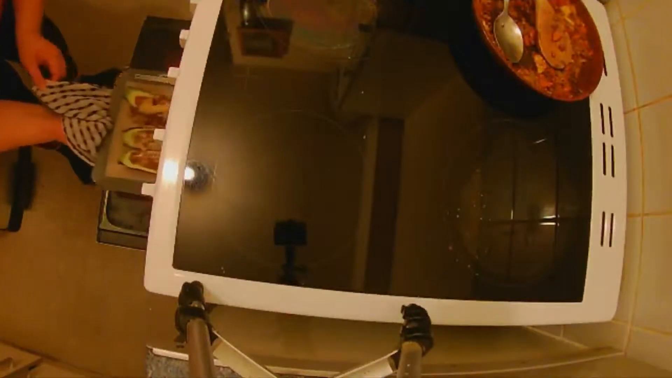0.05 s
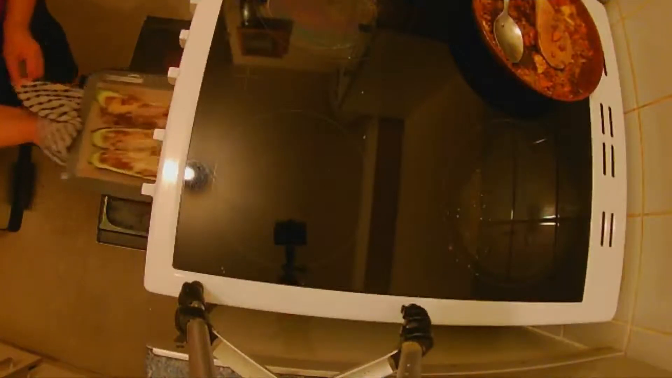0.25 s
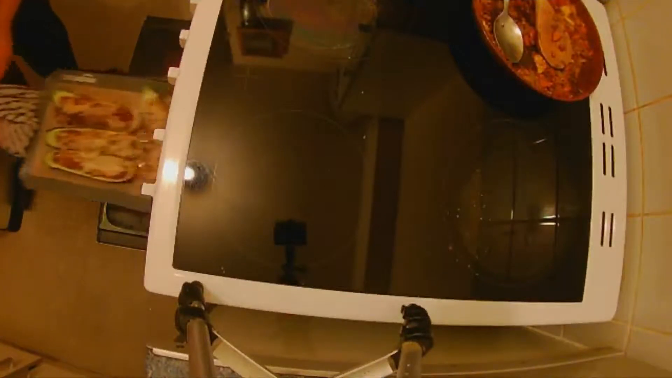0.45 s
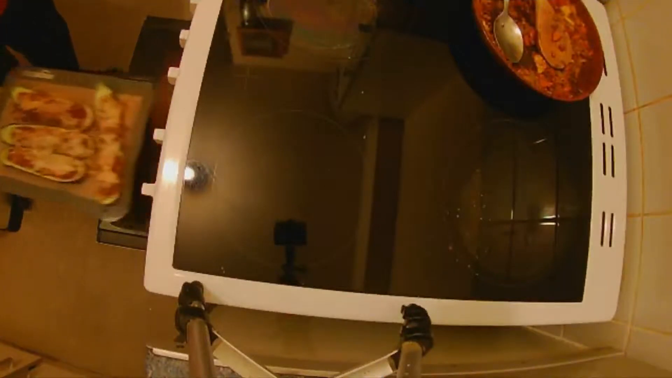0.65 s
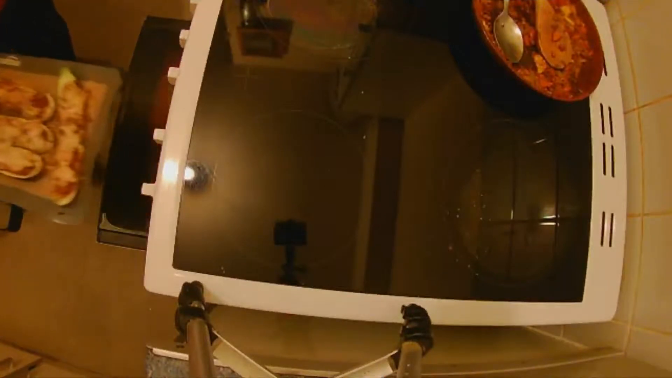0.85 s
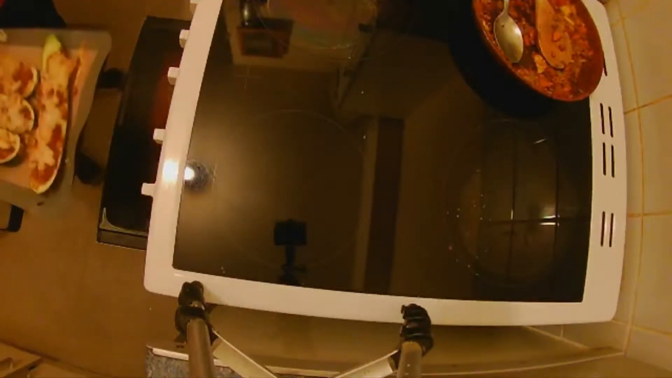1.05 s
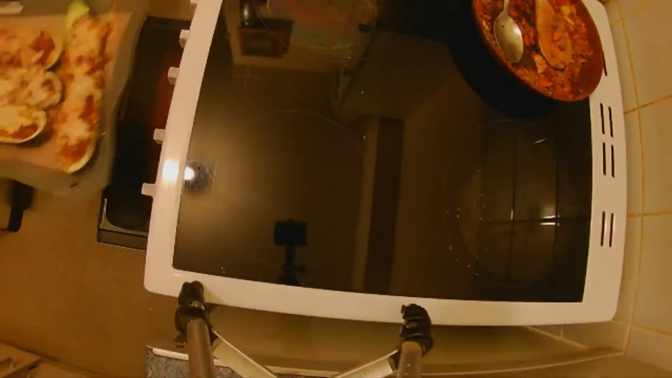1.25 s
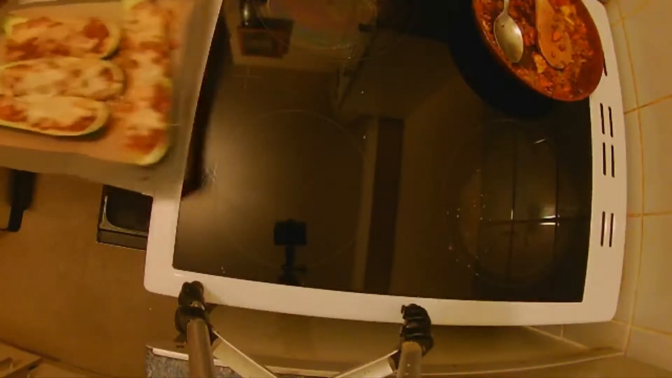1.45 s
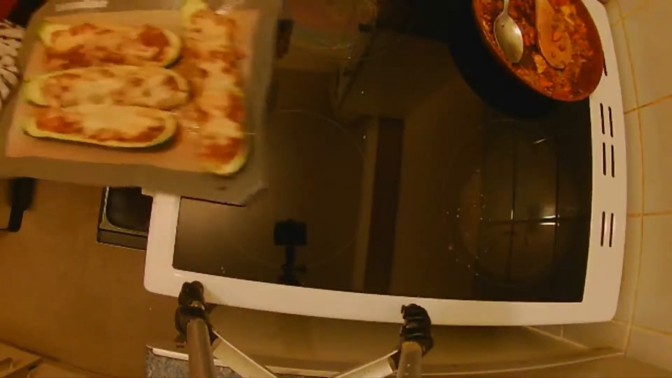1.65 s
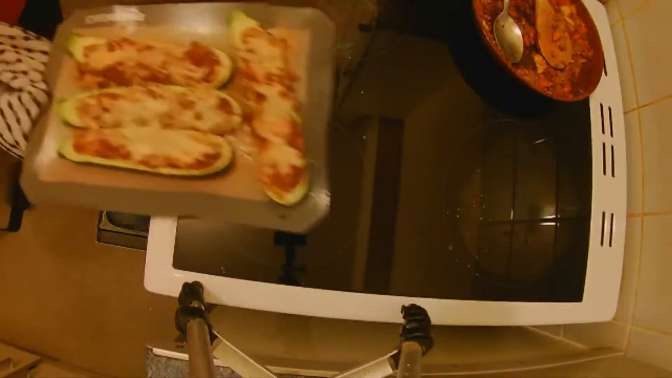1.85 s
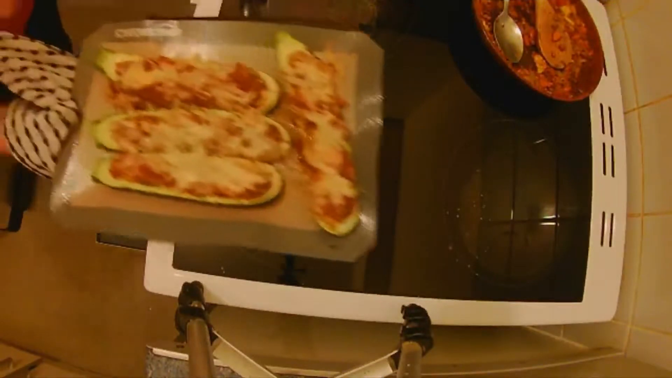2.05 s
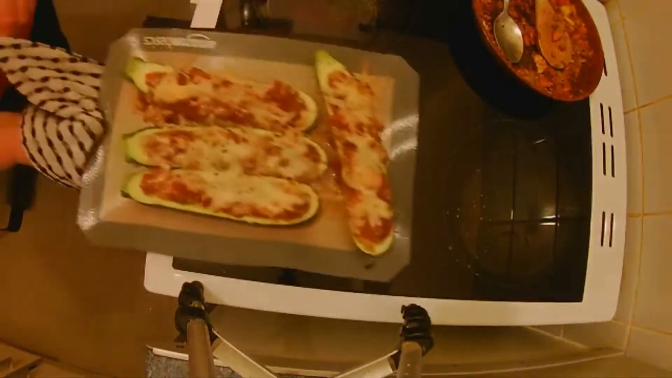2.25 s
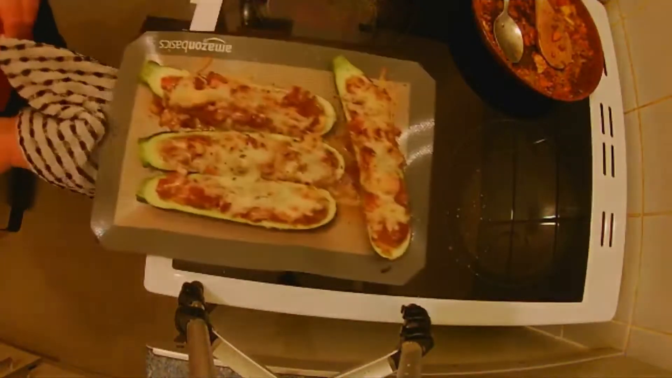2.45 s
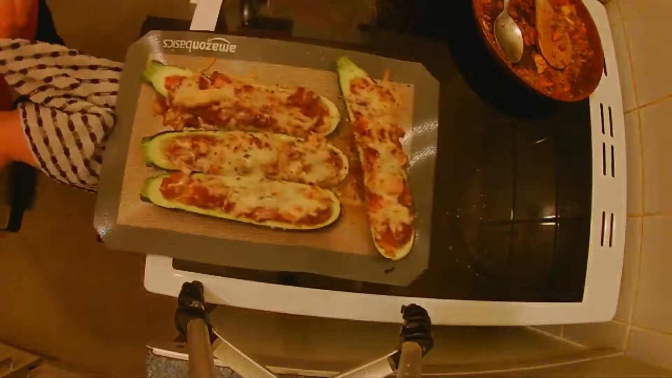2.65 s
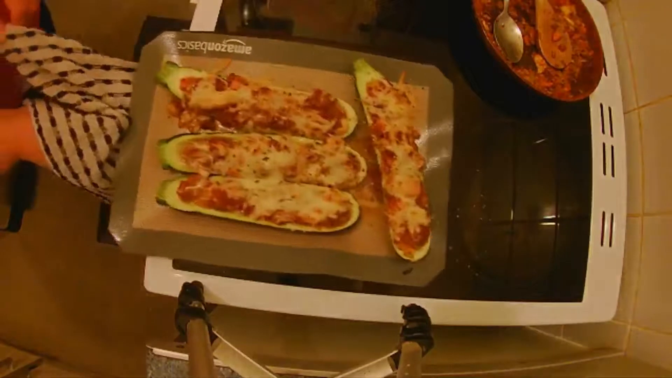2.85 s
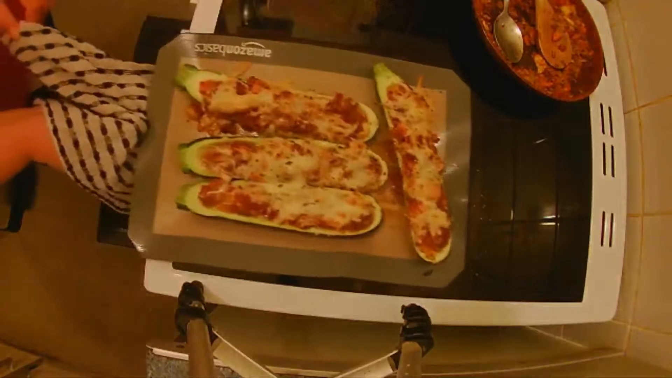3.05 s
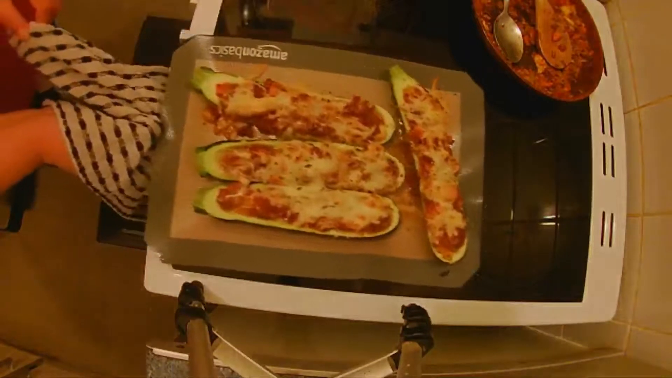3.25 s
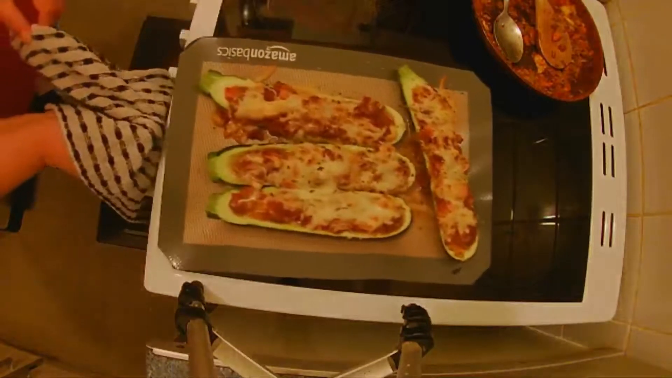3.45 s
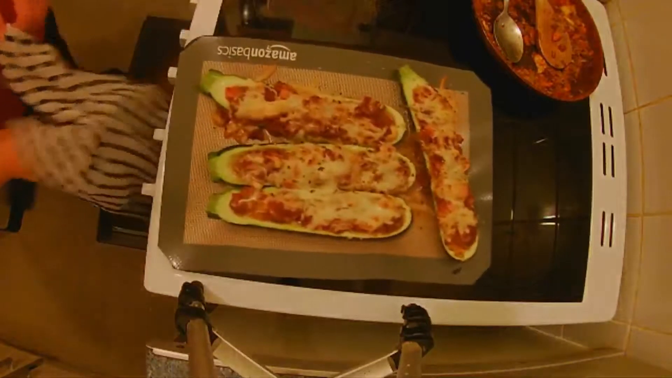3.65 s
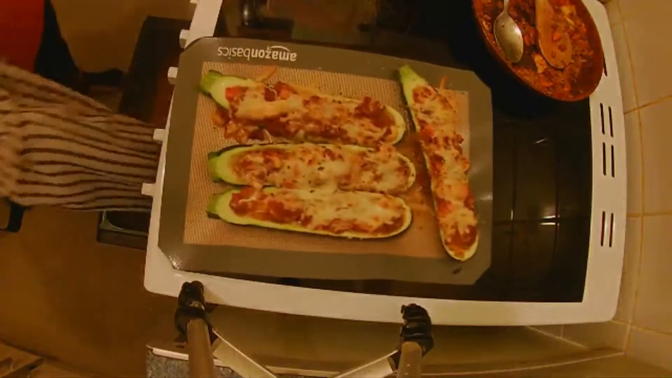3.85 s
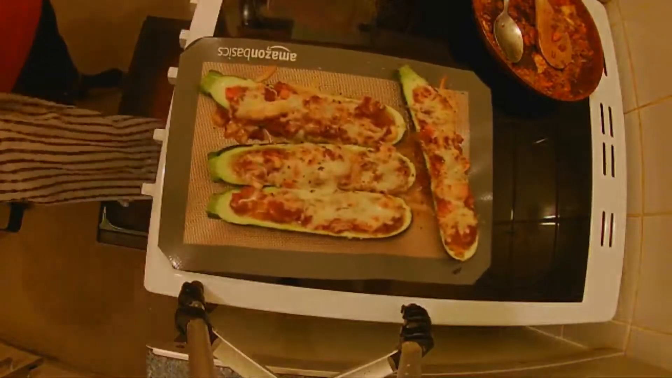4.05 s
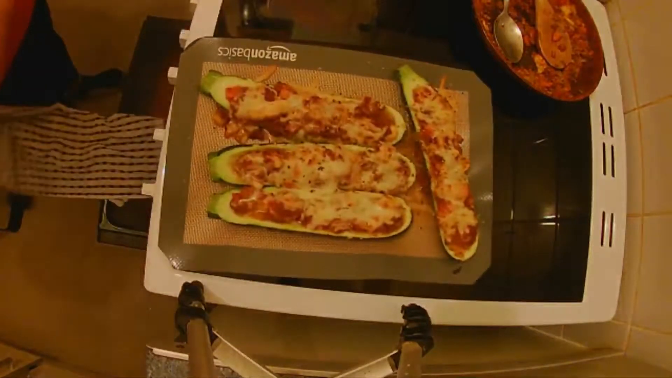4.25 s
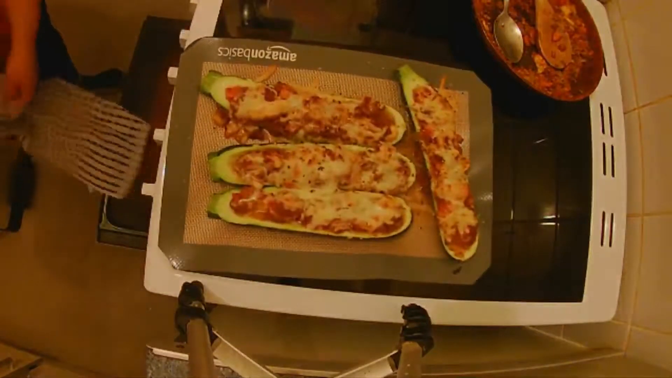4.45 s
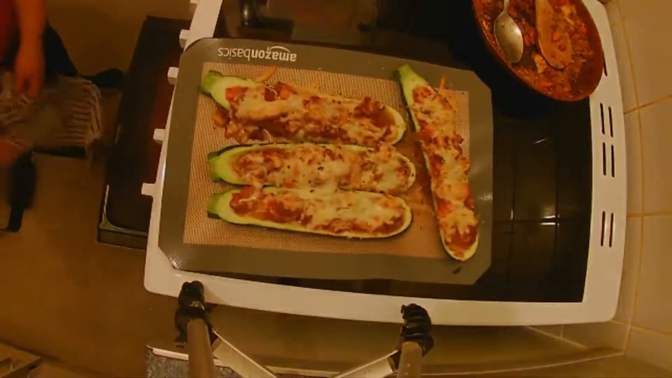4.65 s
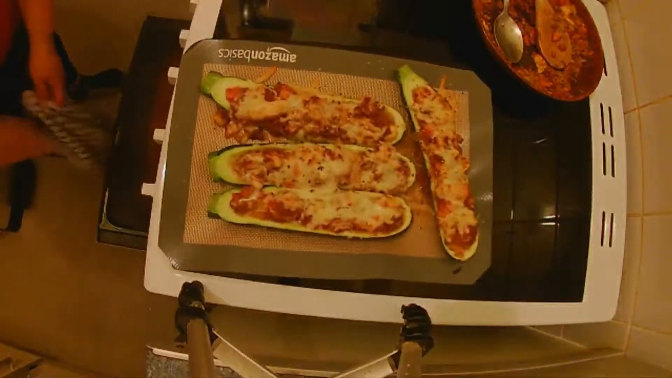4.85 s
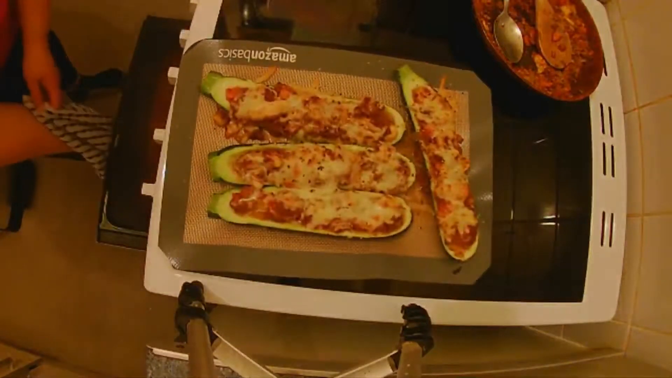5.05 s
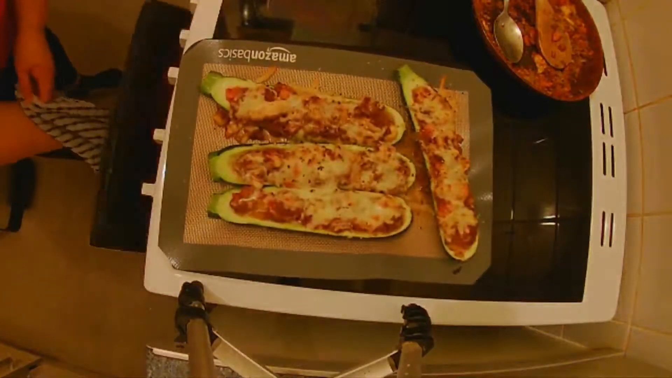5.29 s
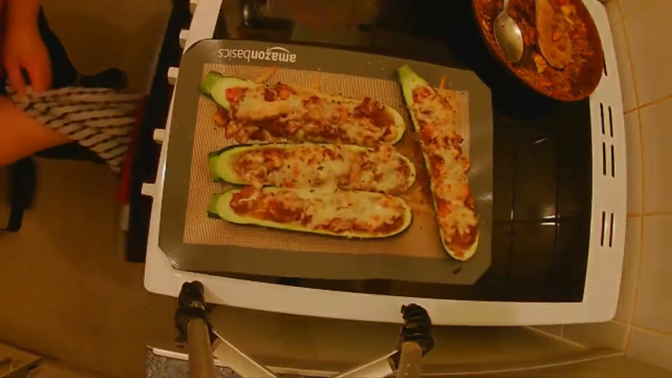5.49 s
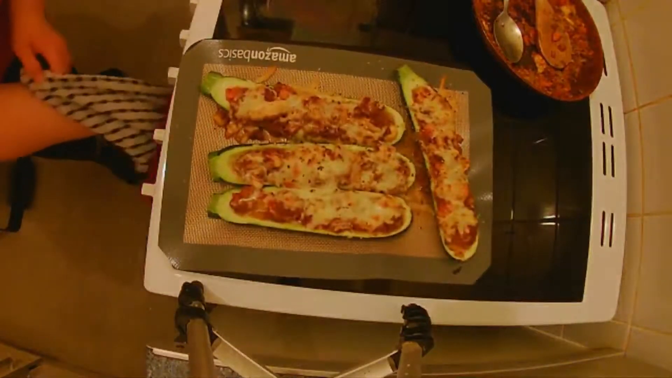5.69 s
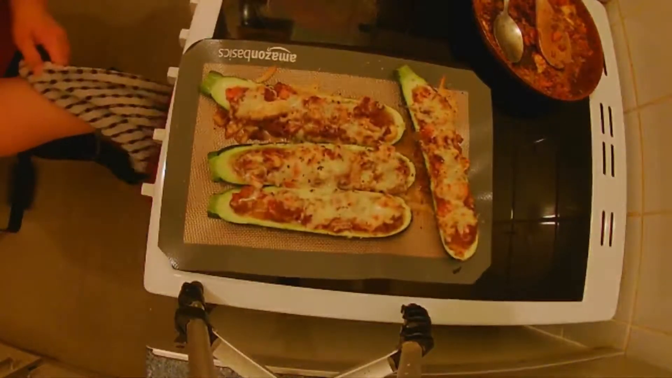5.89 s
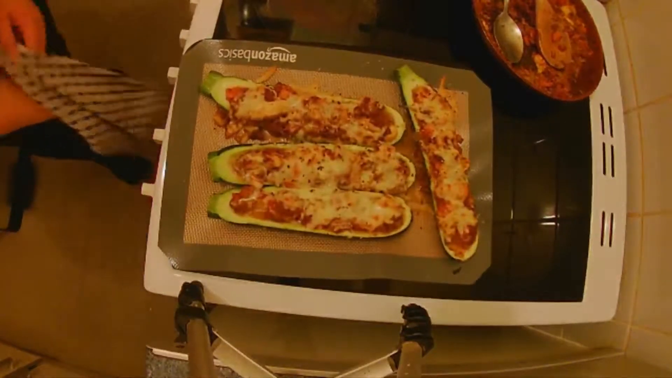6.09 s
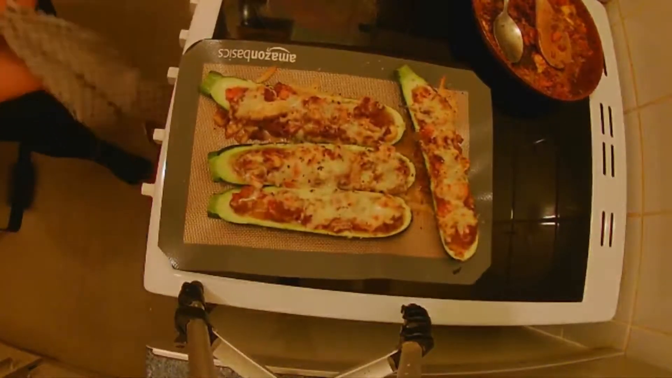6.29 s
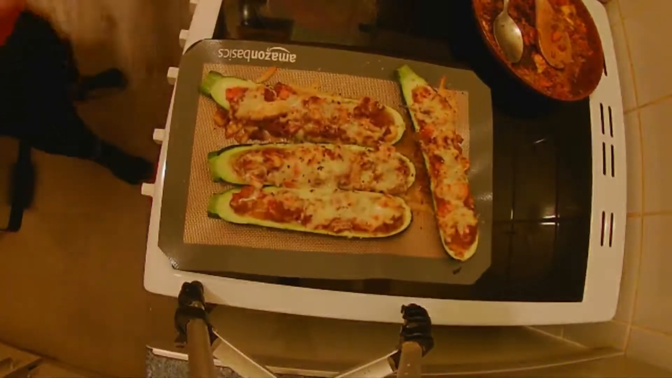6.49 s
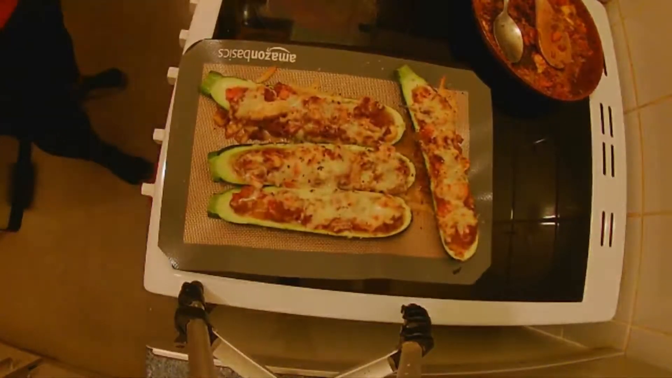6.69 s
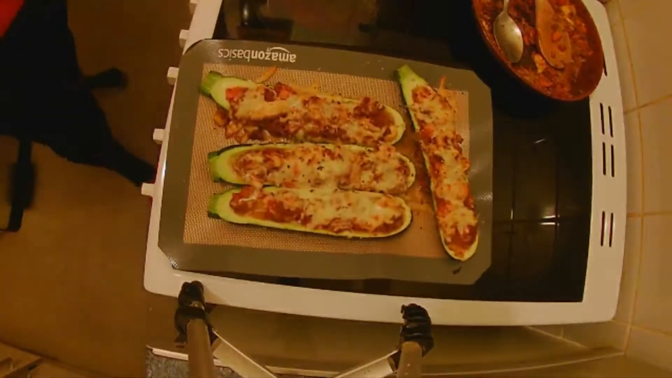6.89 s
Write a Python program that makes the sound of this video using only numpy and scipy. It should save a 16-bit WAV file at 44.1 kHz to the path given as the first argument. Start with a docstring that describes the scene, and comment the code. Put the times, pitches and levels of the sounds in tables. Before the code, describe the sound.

A kitchen with short, hard reflections, miked close above the cooker. A quiet oven fan runs throughout: low airy roar, faint hiss and wavering mains hum. A soft wall clock ticks every second from 0.15 s. Faint cloth rustles occur within the first half second. At 1.63 s a metal tray or rack clanks sharply, again at 1.71, then scrapes grittily along a hard surface, rougher from 1.9, ending in a dense clatter at 2.2-2.4 s. A baking tray taps the glass top at 3.1 s, with soft rustling, then knocks loudest of all at 3.42 s, short and mid-pitched. Near 4.82 s comes a quick double knock on the oven handle. At 5.54-5.62 s the door hinge rattles springily; at 5.79 the door slams with a dull thump, its catch chattering faintly from 5.92. A small rustle follows at 6.06, then only fan and clock until about 7 s.

```python
"""A kitchen with the oven fan running: a metal tray or rack clanks, scrapes along a hard surface and stops, a
baking tray knocks on the glass cooker top, a hand knocks the oven door's handle, and the door knocks on its hinge
spring, slams and chatters on its catch. A tea towel rustles and a wall clock ticks. Blows are noise bursts that
drive resonances, the scrape is grainy friction through the metal's modes, and the fan is shaped noise with hum."""
import sys
import numpy as np
from scipy import signal
from scipy.fft import rfft, irfft, next_fast_len
from scipy.io import wavfile
from scipy.ndimage import uniform_filter1d, map_coordinates

SR = 44100
rng = np.random.default_rng(int(sys.argv[2]) if len(sys.argv) > 2 else 0)


def put_to_file(sound):
    """Save the sound as 16-bit audio at rate SR, in the file named by the first command-line argument."""
    columns = np.atleast_2d(sound).T  # one column per channel
    safe = np.clip(columns, -1, 1)
    whole_steps = np.round(safe * 32767)
    wavfile.write(sys.argv[1], SR, whole_steps.astype(np.int16))


N = 305588

# Blows on each struck thing. Each row: start in seconds, peak in dB before the walls answer, clank in dB (lift of
# the ring's strongest mode), thud of the body and crack of the thin parts in dB re the ring, contact t60 in seconds.
METAL_BLOWS = [(1.634, -18, -3, -11, -11, 0.02), (1.636, -14, -5, -0.5, -10.5, 0.043),
               (1.711, -21.5, 12, -4, -14.5, 0.047), (1.912, -33, 0, -4, -14, 0.032),
               (2.134, -43, 0, -11, 3, 0.079), (2.188, -24, 2, -0.5, -33, 0.03),
               (2.226, -28.5, -3, -21, -18, 0.044), (2.283, -23.5, 6, -17, -2.5, 0.039),
               (2.293, -15, 1.5, -10, -15, 0.043), (2.299, -18, -4, -6.5, -17, 0.034),
               (2.311, -25, 1, -7, -17, 0.038), (2.376, -29.5, -2, 2, -16, 0.103)]
TRAY_BLOWS = [(3.0985, -21, -4.5, -6, -14, 0.045), (3.118, -33.5, -7, -9, -19, 0.042),
              (3.196, -38.5, 0, -16, -22, 0.03), (3.416, -4, 5, -15.5, -18, 0.0451)]
HANDLE_BLOWS = [(4.815, -12, 0, -14.5, -9, 0.0437), (4.824, -17, 0, -11, -11, 0.0596)]
HINGE_BLOWS = [(5.461, -42, -17, -11, -27, .1), (5.535, -24, 4, -3, -7.5, .035),
               (5.542, -20.5, 3.5, -7.5, -12, 0.047), (5.555, -21, -5, -11, -9, 0.046),
               (5.568, -28.5, 1, -5, -9, .04), (5.586, -30, 3, -3, -14, 0.044),
               (5.617, -30.5, 2, -12, -22, 0.038)]
DOOR_BLOWS = [(5.789, -17.5, 0.5, -14, -1.5, 0.077), (5.833, -25.5, -5, -2.5, -17, 0.06),
              (5.862, -33, 2, -7, -15, 0.02)]

# Upper modes, the ring of each struck thing. Each row: frequency in Hz, width in Hz, relative level in dB.
METAL_RING = [(617, 146, -2.5), (905, 300, 2.5), (1200, 530, 1.5), (1500, 160, 7.5), (1930, 640, -12)]
TRAY_RING = [(704, 160, 14.5), (945, 200, 13.5), (1160, 290, 14.5), (1494, 200, 20), (1730, 200, 15),
             (2000, 300, -6)]
HANDLE_RING = [(760, 150, -4), (990, 230, -1.5), (1250, 250, 0), (1480, 180, 4.5), (1750, 300, -8)]
HINGE_RING = [(452, 85, 6), (560, 170, 6), (756, 180, -10), (1070, 190, 3), (1344, 160, 7), (1860, 240, -2)]
DOOR_RING = [(750, 100, -8.5), (1186, 32, 5.5), (1200, 100, -2), (1500, 43, -4), (1610, 260, -4.5),
             (1836, 36, 1), (1950, 270, -6.5)]
CATCH_RING = [(1200, 90, 4), (1500, 230, -17)]

# Modes of the heavier bodies. Each row: frequency in Hz, width in Hz, relative level in dB.
METAL_BODY = [(233, 59, -8), (300, 44, -1), (466, 59, -0.5), (590, 76, -1)]
TRAY_BODY = [(159, 94, -3), (250, 90, 0), (510, 190, 4)]
DOOR_BODY = [(127, 60, -1.5), (214, 62, -0.5), (290, 100, -1.5), (506, 140, 2.5)]
CATCH_BODY = [(675, 68, 2), (856, 120, -10)]

# Modes of the thin parts that crack. Each row: frequency in Hz, width in Hz, relative level in dB.
METAL_THIN = [(2420, 320, 10.5), (2760, 370, 14), (3400, 490, 10), (3980, 410, 10), (4700, 580, 4.5),
              (6300, 560, 0)]
RIM = [(2320, 550, 12), (2680, 330, 6), (3660, 450, -1), (3800, 370, 7), (4160, 400, 4), (5160, 900, -2)]
HANDLE_RIM = [(2300, 290, 6), (2700, 250, 4), (4030, 290, -2.5), (5070, 400, -14)]
DOOR_PANEL = [(2300, 250, -3.5), (2646, 55, 8), (3090, 110, 6.5), (3500, 710, -5), (3900, 110, 3.5),
              (4240, 270, -3), (5000, 450, -8), (5930, 1200, -21)]

# Bright fizz at the point of contact. Each row: frequency in Hz, width in Hz, relative level in dB.
FIZZ = [(8350, 9700, -8), (12400, 2400, 16)]

# The catch swings to and fro: first tap, one full swing, and when the back tap falls as a share of it.
CHATTER_S, SWING_S, BACK_SHARE = 5.923, 0.0745, 0.46
CHATTER_DB, SWING_LOSS_DB, BACK_TAP_DB = -32, 2, -12.5
TAP_THUD_DB, TAP_CRACK_DB, TAP_T60_S = -5.5, -34, 0.022

# Scrape along a hard surface. Each row: time in seconds, scrape level in dB, level of the bright rasp in dB.
SCRAPE_LEVELS = [(1.712, -53, -60), (1.76, -59, -61), (1.82, -53, -58), (1.908, -50.5, -63),
                 (1.916, -44, -54), (1.99, -44.5, -63.5), (2.04, -45, -65), (2.06, -44, -60),
                 (2.09, -46.5, -64), (2.122, -48, -69), (2.145, -40.5, -48), (2.18, -49, -65),
                 (2.28, -53, -65)]
# Middle and bright modes of the scraped metal. Each row: frequency in Hz, width in Hz, relative level in dB.
SCRAPE_MODES = [(500, 310, -3.5), (840, 440, -3), (1250, 190, 0), (1510, 180, 4), (1860, 270, -11)]
SCRAPE_BRIGHT = [(2680, 380, -4), (4020, 250, 1.5), (5030, 1700, -6)]
BODY_DB, BODY_GROWS_DB_PER_S = -4, 11.5  # over the scrape at the start; the boom grows as the scrape goes on
SING_DB, SING_FADE_DB_PER_S = -44, 82  # the strongest mode sings after the jolt that starts the scrape
SLIPS_PER_S, SLIP_SIZE = 210, 2.35  # sudden catches in the scrape; added strength, as a multiple of the grain

# Pushes of air. Each row: start in seconds, level in dB before rise and decay, frequency in Hz, t60 in seconds.
PUFFS = [(1.714, -31, 265, 0.11), (2.3, -40, 64, 0.18), (2.303, -37, 129, 0.25), (2.301, -34, 298, .12),
         (3.42, -34.5, 171, 0.1), (5.561, -35.5, 131, 0.25), (5.828, -22, 135, 0.044),
         (5.84, -36.5, 29, 0.28)]

# Soft rustles. Each row: start in seconds, peak in dB before the walls answer, centre in Hz, t60 in seconds.
RUSTLES = [(.01, -50.5, 4530, 0.023), (0.109, -51.5, 4470, 0.037), (0.301, -52.5, 5000, .04),
           (.303, -59, 11600, 0.037), (.478, -50.5, 11800, 0.012), (.49, -51.5, 4530, 0.086),
           (3.109, -62, 4130, 0.43), (3.135, -47.5, 1250, .2), (3.228, -40, 1050, 0.09),
           (3.265, -45, 1500, 0.075), (6.063, -48, 4220, 0.017), (6.062, -43, 1400, .012)]
RUSTLE_WIDEST_HZ, RUSTLE_RISE = 3800, 0.073  # limit of the bandwidth; rise as a share of t60

# Wall clock, tick by tick. Each entry: peak in dB before the walls answer.
TICKS_DB = [-46.5, -45, -46, -45, -46, -44, -47]
# Modes of the clock's case. Each row: frequency in Hz, width in Hz, relative level in dB.
CLOCK_CASE = [(1200, 59, 2.5), (1630, 120, 0), (2470, 330, -9), (4000, 330, -9), (5800, 500, -20)]
TICK_S, TICK_EVERY_S, TICK_RISE_S, TICK_T60_S = 0.152, 1, 0.019, 0.099

# Spectrum of the fan's air. Each row: frequency in Hz, relative density in dB per Hz.
AIR = [(15, -35), (25, -5), (40, -12), (75, -12.5), (108, -15), (170, -15), (243, -18), (414, -16.5),
       (700, -20), (1500, -21), (2000, -27.5), (4200, -27), (7500, -30), (13000, -28.5), (13600, -32),
       (16300, -41)]
# Level of the high hiss. Each row: time in seconds, level in dB rms.
HISS = [(0, -69), (1.5, -68.5), (4.1, -70), (4.45, -66), (4.8, -69.5), (6.4, -72), (6.93, -66.5)]
# Hum lines. Each row: frequency in Hz, mean level in dB rms, scale of the frequency wander in Hz.
HUM = [(50.5, -58.5, 0.73), (99.6, -67, 2.55), (243, -66.5, 4.4)]
ROAR_DB, STEADY_DB = -57.5, -77  # low roar, as its rms above 300 Hz; the rest of the air, rms

# Reverberation of the kitchen. Each row: frequency in Hz, t60 in seconds.
KITCHEN = [(100, 0.97), (400, 0.24), (1500, 0.18), (4000, 0.26), (8000, 0.27), (15000, 0.04)]
TOP_HZ = 16400


def struck(blows, ring, body, thin, body_lag_s, push, rise_share,
           fizz_db, fizz_per_crack, fizz_t60, wet_db):
    """Modal excitation: a contact force drives ring, thin parts and, later, the body, and fizzes briefly."""
    track = np.zeros(N)
    strongest = max(ring, key=lambda mode: mode[2])
    for s, db, clank_db, thud_db, crack_db, t60 in blows:
        rung = [(hz, width, level + clank_db * (hz == strongest[0])) for hz, width, level in ring]
        rise = rise_share * t60
        force = burst(rise, t60)
        force[round(2 * rise * SR)] += push  # the hard first contact
        late_force = np.pad(force, (round(body_lag_s * SR), 0))[:len(force)]
        ringing = coloured(force, [(rung, 0), (thin, crack_db)])
        thud = coloured(late_force, [(body, thud_db)])
        first_force = force * amp(-60 * np.arange(len(force)) / SR / fizz_t60)
        fizz = coloured(first_force, [(FIZZ, fizz_db + fizz_per_crack * crack_db)])
        add(track, s, kitchen(peaked(ringing + thud + fizz, db), wet_db))
    return track


def scrape():
    """Friction: uneven grains along a hard surface excite the resonances of the scraped metal."""
    t = np.arange(N) / SR
    start, end = SCRAPE_LEVELS[0][0], SCRAPE_LEVELS[-1][0]
    moving = (t > start) & (t < end)
    scrape_db, bright_db = curves(SCRAPE_LEVELS)
    body_db = scrape_db + BODY_DB + BODY_GROWS_DB_PER_S * np.clip(t - start, 0, 1)
    sing_db = SING_DB - SING_FADE_DB_PER_S * np.abs(t - start)

    slips = rng.random(N) < SLIPS_PER_S / SR
    unevenness = amp(2.5 * wobble(150) + wobble(30))
    grains = unit(rng.standard_normal(N) * (1 + SLIP_SIZE * slips) * unevenness)

    strongest = max(SCRAPE_MODES, key=lambda mode: mode[2])
    middle = amp(scrape_db) * coloured(grains, [(SCRAPE_MODES, 0)])
    body = amp(body_db) * coloured(grains, [(METAL_BODY, 0)])
    bright = amp(bright_db) * coloured(grains, [(SCRAPE_BRIGHT, 0)])
    sing = amp(sing_db) * coloured(grains, [([strongest], 0)])
    return moving * (middle + body + bright + sing)


def chatter(count):
    """Damped oscillation of the catch: every swing gives a tap and a weaker back tap, each swing quieter."""
    blows = []
    for k in range(count):
        for back in range(2):
            s = CHATTER_S + SWING_S * (k + BACK_SHARE * back)
            db = CHATTER_DB - SWING_LOSS_DB * k + BACK_TAP_DB * back
            blows.append((s, db, 0, TAP_THUD_DB, TAP_CRACK_DB, TAP_T60_S))
    return blows


def puffs():
    """Damped vibration: a heavy stop swings the cooker's frame and pushes the air as a dying sine."""
    track, t = np.zeros(N), np.arange(SR // 2) / SR
    for s, db, hz, t60 in PUFFS:
        envelope = amp(db - 60 * t / t60) * (1 - np.exp(-t / 0.0019))
        add(track, s, envelope * np.sin(2 * np.pi * hz * t))
    return track


def rustles():
    """Random contacts of cloth, fingers and light scuffs: soft noise bursts in a broad band."""
    track = np.zeros(N)
    for s, db, hz, t60 in RUSTLES:
        band = [(hz, min(hz, RUSTLE_WIDEST_HZ), 0)]  # as wide as its centre, up to the limit
        sound = coloured(burst(RUSTLE_RISE * t60, t60), [(band, 0)])
        add(track, s, kitchen(peaked(sound, db), wet_db=-2.0))
    return track


def clock():
    """Resonance of a case under a periodic force: one soft tick a second, with a strong answer of the walls."""
    track = np.zeros(N)
    for k, db in enumerate(TICKS_DB):
        tick = coloured(burst(TICK_RISE_S, TICK_T60_S), [(CLOCK_CASE, 0)])
        add(track, TICK_S + k * TICK_EVERY_S, kitchen(peaked(tick, db), wet_db=-3.5))
    return track


def fan():
    """Broadband flow noise and tonal hum: air roars low and hisses high, motor and mains hum on wavering lines."""
    def low(hz):
        return 1 / (1 + (hz / 2200) ** 4)

    air = filtered(rng.standard_normal(N), lambda hz: amp(along(AIR, hz)))
    roar = filtered(air, low)
    hiss = filtered(air, lambda hz: (1 - low(hz)) / (1 + (hz / 7500) ** 4))
    steady = amp(STEADY_DB) * unit(air - roar - hiss)

    roar_rms = filtered(roar, lambda hz: hz > 300).std()
    roar_gain = amp(ROAR_DB + 0.9 * wobble(5))
    hiss_db, = curves(HISS)
    hiss_gain = amp(hiss_db + 0.16 * wobble(3.27))

    hum = np.zeros(N)
    for hz, db, wander in HUM:
        phase = 2 * np.pi * np.cumsum(hz + wander * wobble(15)) / SR
        hum += np.sqrt(2) * amp(db + 1.6 * wobble(5.3)) * np.sin(phase)
    return roar_gain * roar / roar_rms + hiss_gain * unit(hiss) + steady + hum


def kitchen(x, wet_db):
    """Reverberation: adds the walls' answer; each frequency dies at its own speed with an even energy share."""
    hz, t, z = signal.stft(rng.standard_normal(SR // 2), SR, nperseg=256)
    decay = amp(-60 * t / along(KITCHEN, hz)[:, None])
    even = np.linalg.norm(decay, axis=1) / np.linalg.norm(z * decay, axis=1)
    tail = signal.istft(z * decay * even[:, None], SR, nperseg=256)[1]
    delayed = np.pad(x, (150, 0))  # in samples
    wet = signal.fftconvolve(delayed, tail / np.linalg.norm(tail))[:len(x)]
    return x + amp(wet_db) * wet


def burst(rise, t60):
    """Contact force as broadband excitation: a noise burst that swells and dies, its spectrum evened out."""
    t = np.arange(SR // 3) / SR
    envelope = (1 - np.exp(-t / max(rise, 1e-4))) * amp(-60 * t / max(t60, 1e-3))
    noise = rng.standard_normal(len(t)) * envelope
    z = rfft(noise)
    local_power = uniform_filter1d(np.abs(z) ** 2, size=60)
    even = irfft(z / np.sqrt(local_power), len(t)) * (t < 0.3)
    return even * np.linalg.norm(noise) / np.linalg.norm(even)


def power(modes, f):
    """Superposed resonance power of mean 1; the contact is too soft to excite much above the top mode."""
    p = sum(amp(db) ** 2 * (f * w) ** 2 / ((c * c - f * f) ** 2 + (f * w) ** 2) for c, w, db in modes)
    p = p / (1 + (f / (1.003 * modes[-1][0])) ** 6)
    p = p / (1 + (0.5 * modes[0][0] / (f + 1)) ** 4)  # little far below the lowest mode
    return p / p.mean()


def coloured(x, layers):
    """Causality: x through the minimum-phase filter whose power is the sum of (modes, dB) layers."""
    m = 2 * next_fast_len(len(x) // 2 + SR // 8)
    f = np.fft.rfftfreq(m, 1 / SR)
    total = sum(amp(db) ** 2 * power(modes, f) for modes, db in layers)
    cepstrum = irfft(np.log(total + 1e-12) / 2, m)
    cepstrum[1:m // 2] *= 2  # folding the cepstrum forward in time gives minimum phase
    cepstrum[m // 2 + 1:] = 0
    return irfft(rfft(x, m) * np.exp(rfft(cepstrum)), m)[:len(x)]


def filtered(x, response):
    """Linear filtering: x times a response of frequency."""
    m = next_fast_len(x.shape[-1] + SR // 4)
    return irfft(rfft(x, m) * response(np.fft.rfftfreq(m, 1 / SR)), m)[..., :x.shape[-1]]


def peaked(x, db):
    """Level by short-time energy: the loudest 8 ms swing about as far as db."""
    return amp(db) * x / np.sqrt(8 * np.max(uniform_filter1d(x ** 2, size=350)))


def amp(db):
    """Logarithmic level: dB to gain."""
    return 10 ** (np.asarray(db) / 20)


def unit(x):
    """Effective value: scaled to rms 1."""
    return x / np.sqrt(np.mean(x ** 2) + 1e-20)


def along(points, hz):
    """Logarithmic pitch: interpolates (Hz, value) points on a log axis."""
    f, v = np.transpose(points)
    return np.interp(np.log(hz + 1), np.log(f + 1), v)


def curves(rows):
    """Linear interpolation: one value per sample for each column after the time."""
    s, *cols = np.transpose(rows)
    return [np.interp(np.arange(N) / SR, s, c) for c in cols]


def wobble(rate):
    """Slow random modulation: a smooth curve through random knots, rate knots a second."""
    knots = rng.standard_normal(int(N * rate / SR) + 4)
    return map_coordinates(knots, [np.arange(N) * rate / SR])


def add(track, s, sound):
    """Superposition: mixes a sound into the track at s seconds."""
    part = track[round(s * SR):][:len(sound)]
    part += sound[:len(part)]


def scene():
    """Superposition: all sources summed at one microphone."""
    metal = struck(METAL_BLOWS, METAL_RING, METAL_BODY, METAL_THIN, body_lag_s=0.0029, push=2.5,
                   rise_share=0.0073, fizz_db=-7.5, fizz_per_crack=1.75, fizz_t60=0.1, wet_db=-8.0)
    tray = struck(TRAY_BLOWS, TRAY_RING, TRAY_BODY, RIM, body_lag_s=0.00502, push=7.5,
                  rise_share=0.0129, fizz_db=-31, fizz_per_crack=0.2, fizz_t60=0.012, wet_db=-7.5)
    handle = struck(HANDLE_BLOWS, HANDLE_RING, DOOR_BODY, HANDLE_RIM, body_lag_s=0.0049, push=4,
                    rise_share=0.01306, fizz_db=-30.5, fizz_per_crack=0, fizz_t60=0.012, wet_db=-9.0)
    hinge = struck(HINGE_BLOWS, HINGE_RING, DOOR_BODY, RIM, body_lag_s=0.00402, push=1.6,
                   rise_share=0.043, fizz_db=-24.0, fizz_per_crack=0.86, fizz_t60=0.3, wet_db=-3.0)
    door = struck(DOOR_BLOWS, DOOR_RING, DOOR_BODY, DOOR_PANEL, body_lag_s=0.00304, push=0.98,
                  rise_share=0.093, fizz_db=-27.5, fizz_per_crack=0.8, fizz_t60=0.3, wet_db=-3.5)
    catch = struck(chatter(count=3), CATCH_RING, CATCH_BODY, DOOR_PANEL, body_lag_s=0.00616, push=0.51,
                   rise_share=0.1, fizz_db=-38, fizz_per_crack=0, fizz_t60=0.03, wet_db=-25)
    blows = metal + tray + handle + hinge + door + catch
    return (blows + scrape() + puffs() + rustles() + clock() + fan())[None]


def record(dry):
    """Band limitation: nothing above TOP_HZ is kept."""
    return filtered(dry, lambda hz: hz < TOP_HZ)


dry = scene()
out = record(dry)
put_to_file(out)
```